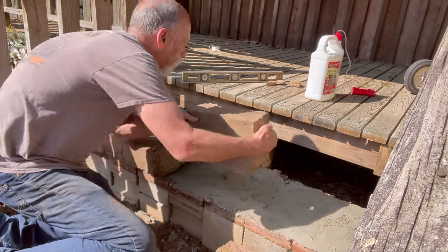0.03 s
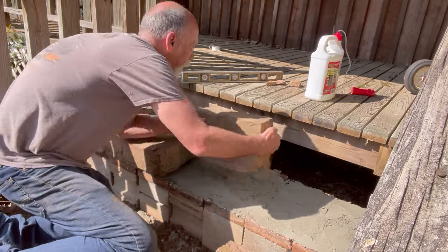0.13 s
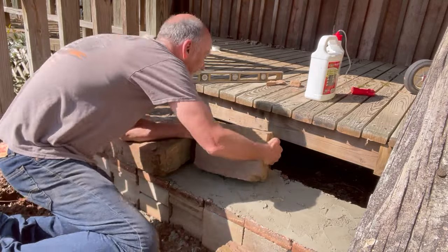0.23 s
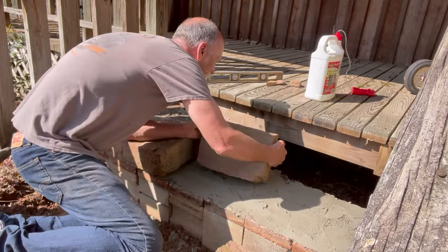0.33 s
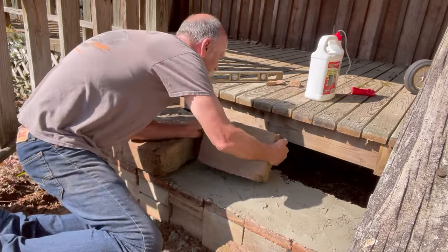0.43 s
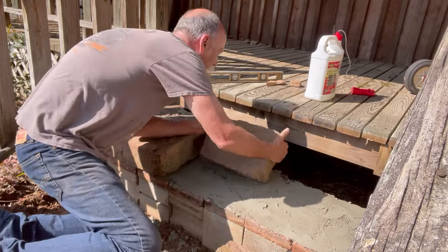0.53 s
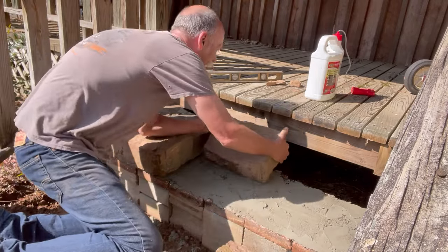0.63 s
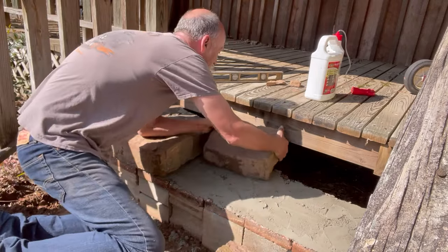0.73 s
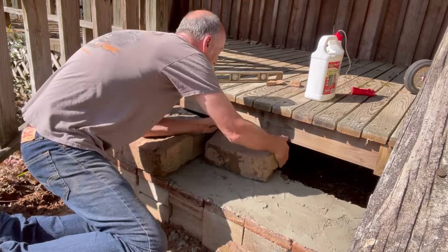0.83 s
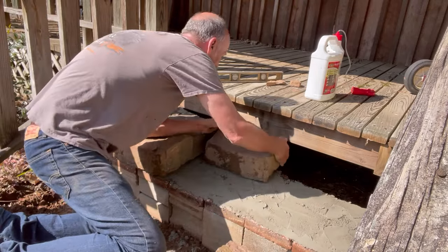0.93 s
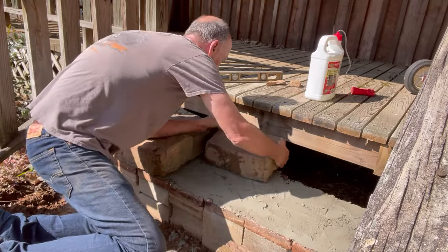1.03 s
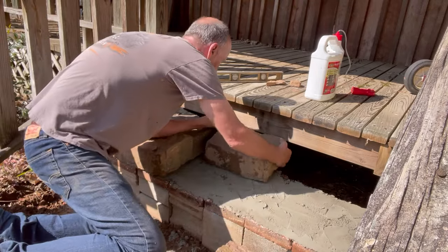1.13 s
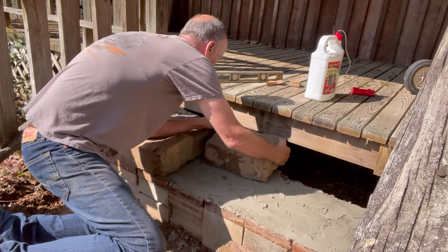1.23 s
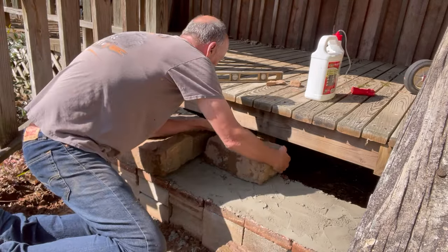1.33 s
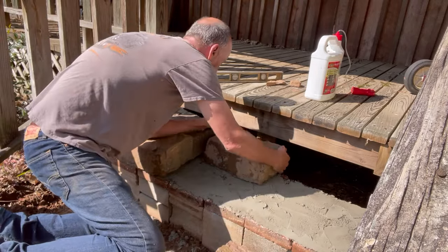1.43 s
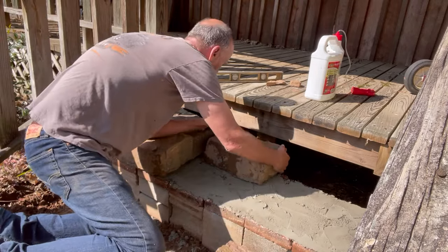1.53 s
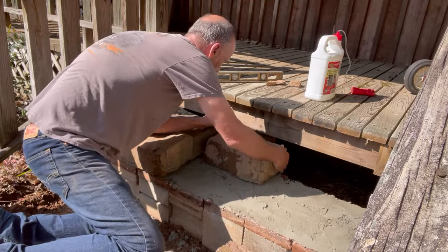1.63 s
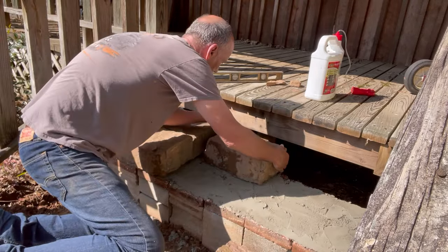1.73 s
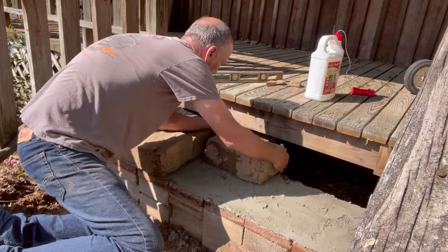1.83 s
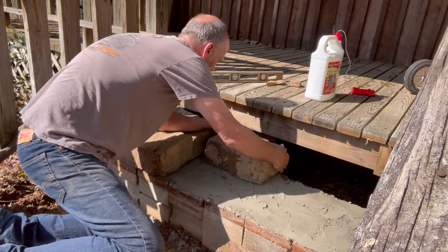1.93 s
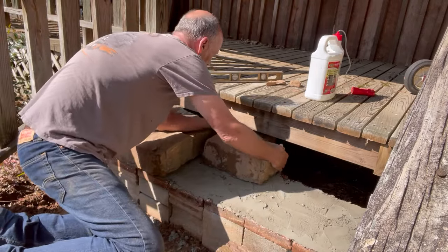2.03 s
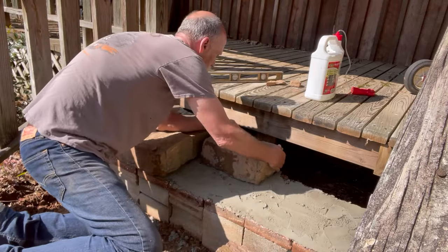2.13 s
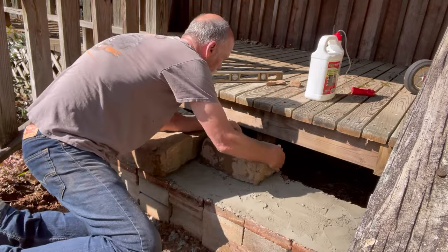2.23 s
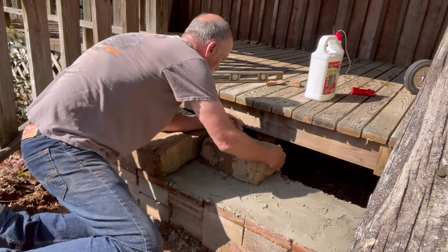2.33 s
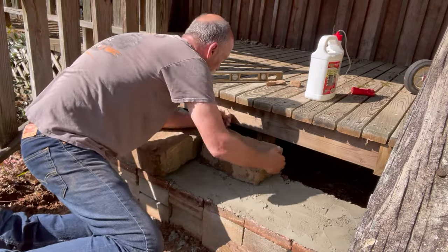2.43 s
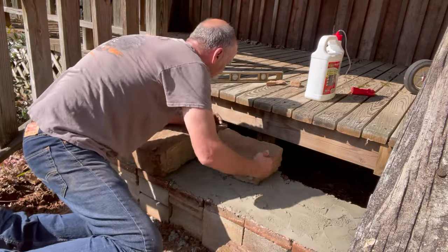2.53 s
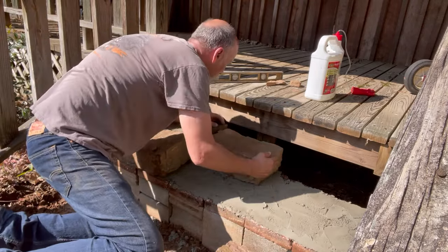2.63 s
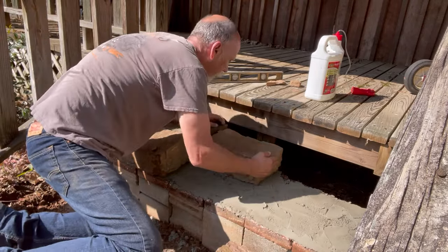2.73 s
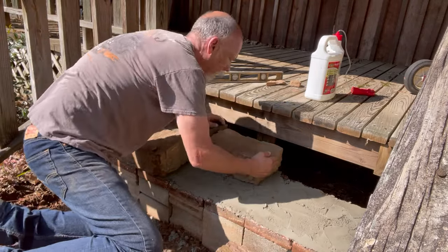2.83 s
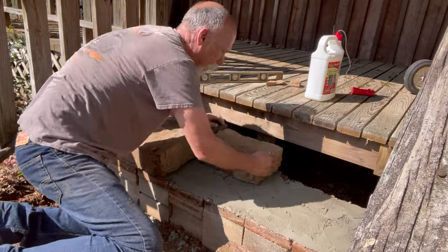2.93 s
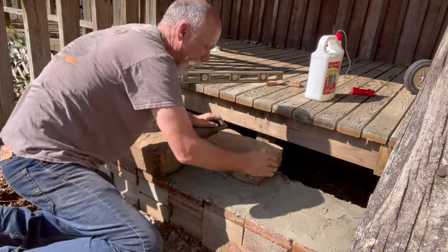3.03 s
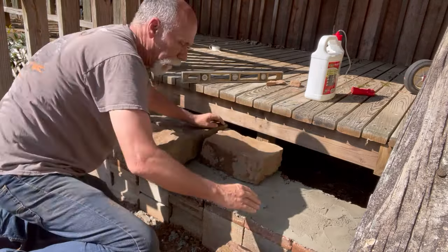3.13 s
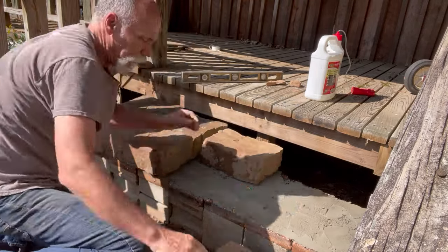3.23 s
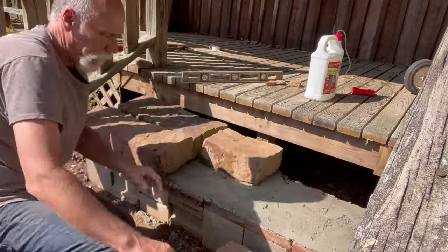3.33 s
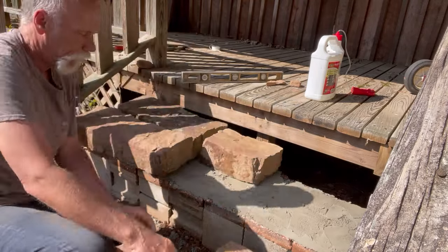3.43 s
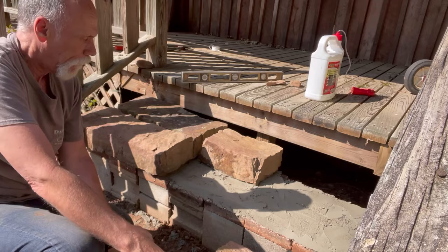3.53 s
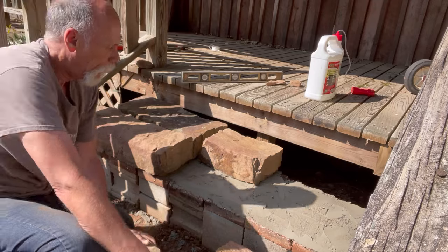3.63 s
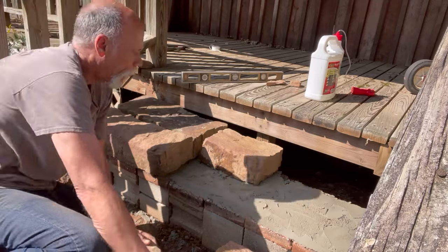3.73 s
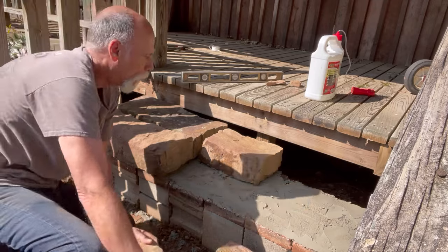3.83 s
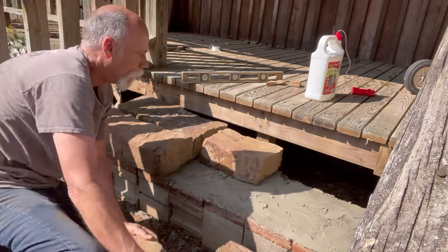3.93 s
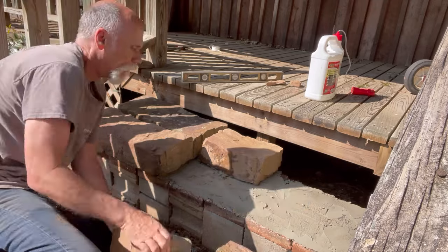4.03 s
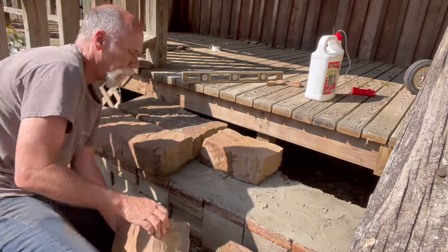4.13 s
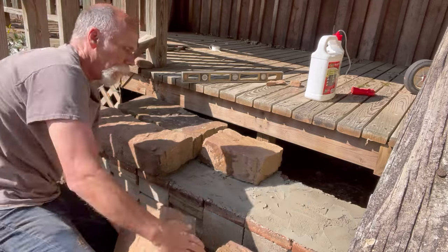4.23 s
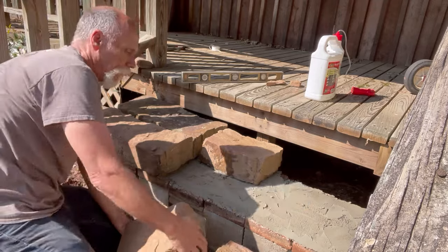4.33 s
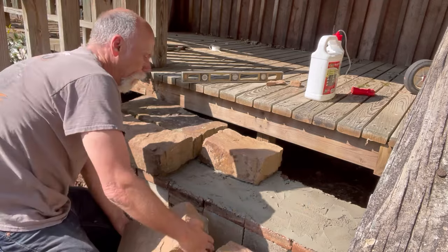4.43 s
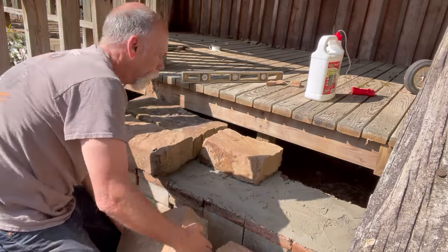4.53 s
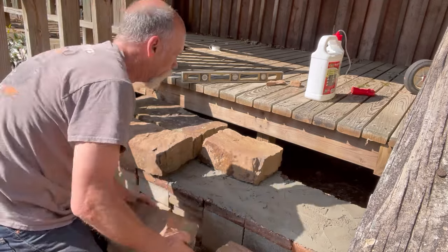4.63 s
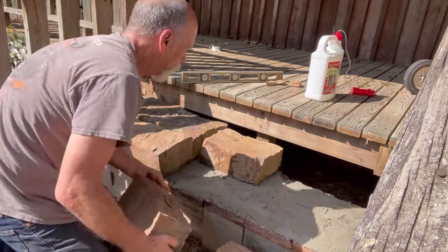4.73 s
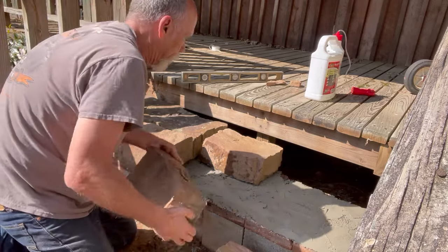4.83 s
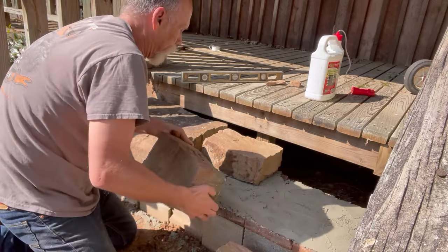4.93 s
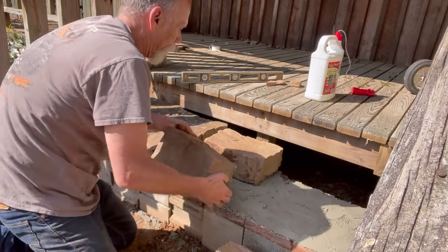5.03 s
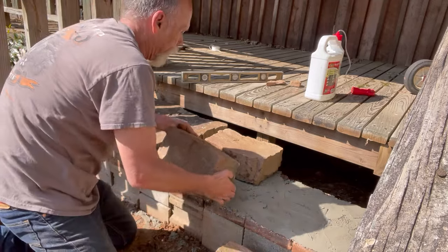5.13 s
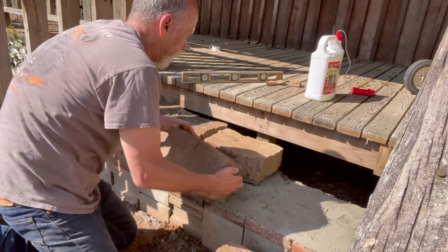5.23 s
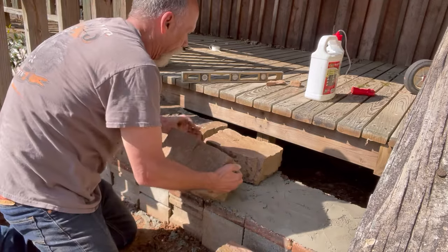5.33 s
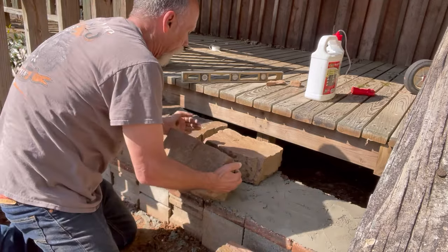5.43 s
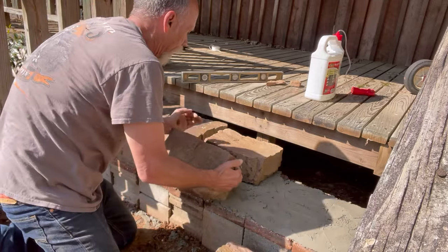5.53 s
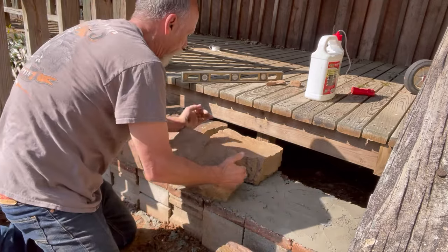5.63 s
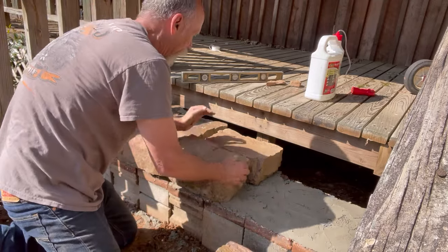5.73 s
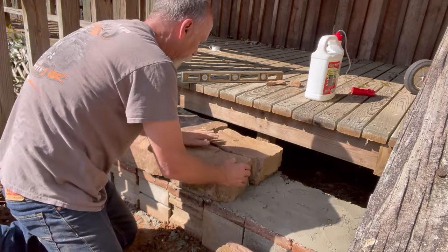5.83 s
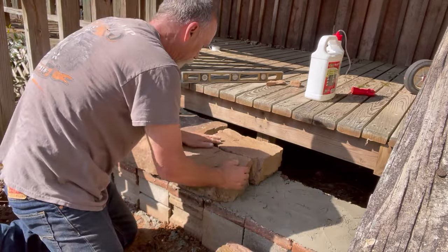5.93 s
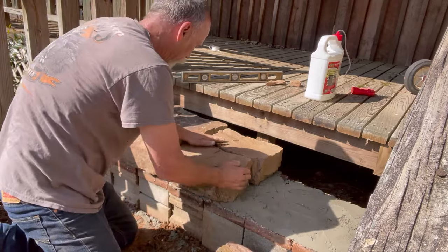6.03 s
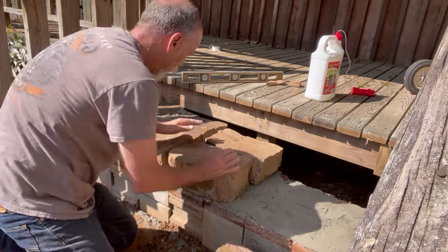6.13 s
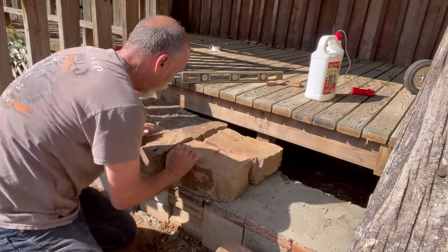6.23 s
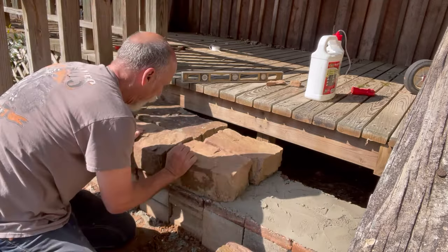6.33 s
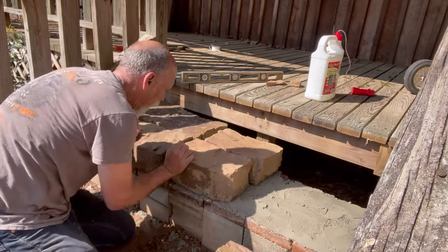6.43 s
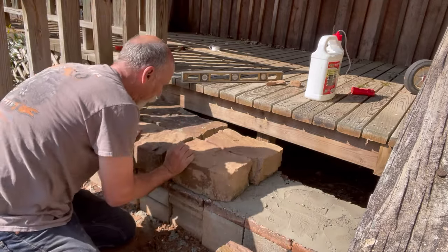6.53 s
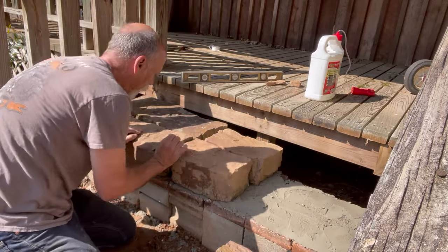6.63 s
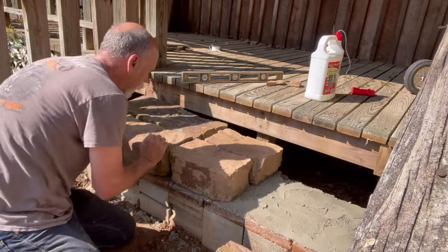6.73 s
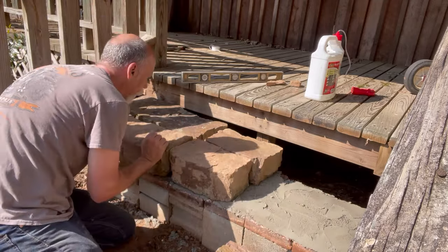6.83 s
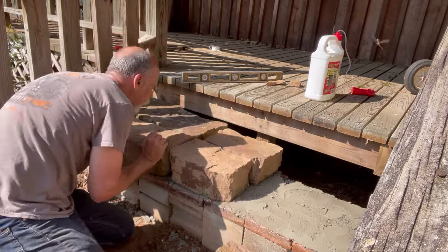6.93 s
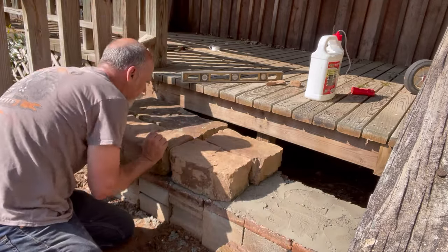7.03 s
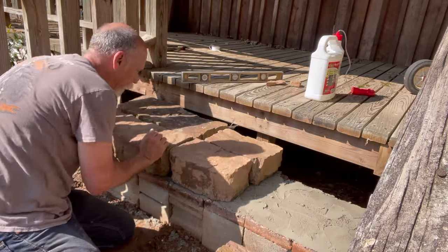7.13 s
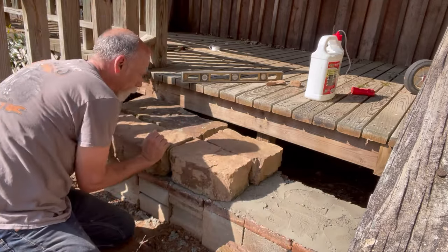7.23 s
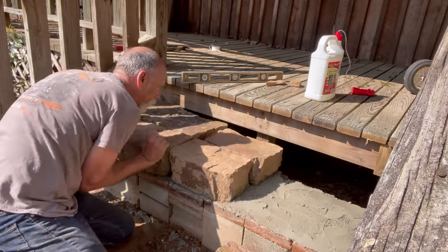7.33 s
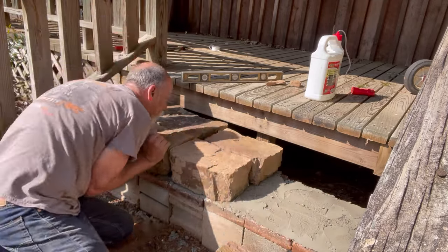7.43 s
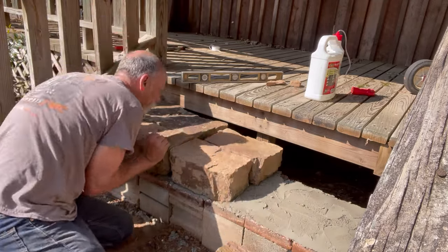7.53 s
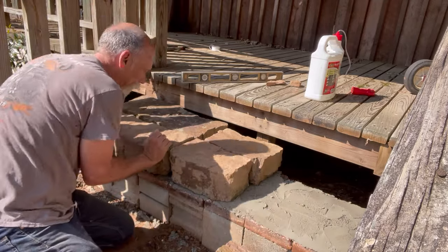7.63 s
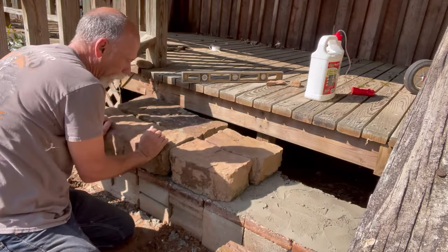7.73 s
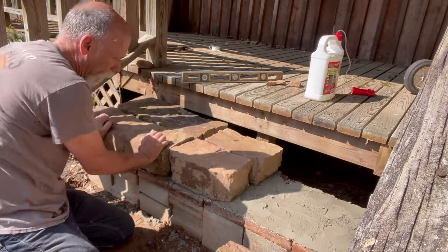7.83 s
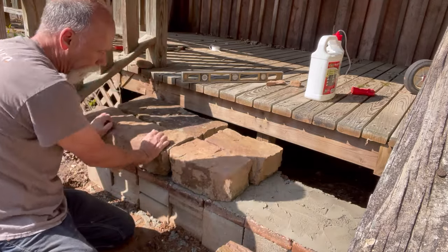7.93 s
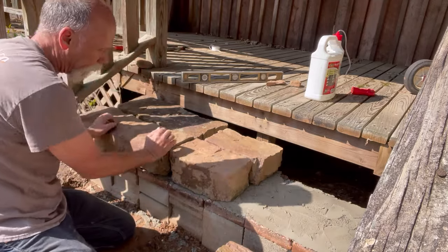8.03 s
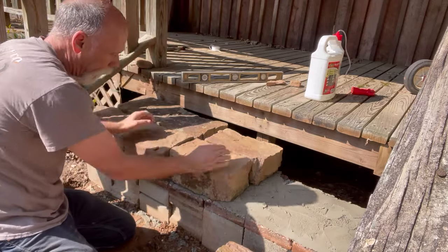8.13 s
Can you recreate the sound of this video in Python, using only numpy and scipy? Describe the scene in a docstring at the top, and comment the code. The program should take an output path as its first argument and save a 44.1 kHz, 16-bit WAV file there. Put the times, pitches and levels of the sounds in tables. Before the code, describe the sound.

Outdoors beside a wooden deck, a nearby microphone picks up a stone block being slid and knocked into position, with sharp clacks and crunching grit. After a lull of soft shuffling and small rubble clicks, a second block knocks against the stone several times and is bumped firmly home. One more knock and light scrapes follow. Faint clothing rustle and a distant, road-like hum and hiss lie underneath.

```python
"""Two sandstone blocks are set by hand on a mortared ledge under a wooden deck.
Over a distant hum and hiss, clothes rustle and the first block is slid and knocked into place.
Each impact excites the block's modes in a short clack, then the ledge's in a slower thud; grit ticks
and scrapes, and the deck reflects it all. From about 3 s the hands only stir loose rubble. After 5 s
the second block is knocked home, and a few light taps and scrapes follow."""
import sys
import numpy as np
from scipy import signal
from scipy.fft import rfft, irfft, next_fast_len
from scipy.io import wavfile
from scipy.ndimage import uniform_filter1d

SR = 44100
rng = np.random.default_rng(int(sys.argv[2]) if len(sys.argv) > 2 else 0)


def generate_wav(signal):
    """Clip the signal to [-1, 1] and save it as 16-bit WAV at the path in sys.argv[1]."""
    frames = np.transpose(np.atleast_2d(signal))
    scaled = np.clip(frames, -1, 1) * 32767
    pcm = np.round(scaled).astype(np.int16)
    wavfile.write(sys.argv[1], SR, pcm)


N = 361619
RUBBLE_S, SECOND_BLOCK_S = 2.85, 4.9  # when the hands turn to the rubble, then to the second block

# Each row: start in seconds, clack peak in dB, contact pitch in Hz, bright edge peak in dB,
# thud peak in dB, left over right in dB, contact time in seconds.
KNOCKS = [(0.187, -47, 654, -65, -42, -3, 0.0013), (0.3225, -14, 1030, -19, -14.5, 0, 0.0015),
          (0.341, -30, 1490, -52, -52, -3, 0.00095), (0.368, -39, 1390, -29.5, -32, -1, 0.0033),
          (0.635, -43, 1370, -59, -47, -2, .0013), (0.744, -45, 1140, -44.5, -62, -2, 0.0027),
          (0.8185, -26.5, 605, -31, -27, -3, 0.0016), (0.906, -40, 640, -36, -35, 1, 0.001),
          (0.945, -16, 730, -23.5, -25, -2.5, 0.0018), (1.4147, -6, 1125, -19, -14, -1.5, 0.0018),
          (1.4198, -34, 277, -50, -26, 3, 0.0029), (1.429, -42, 910, -35, -34, 2, 0.00077),
          (1.848, -47, 493, -67, -42.5, 20, 0.0024), (2.064, -40.5, 2630, -37, -43, 1, 0.0022),
          (2.211, -42, 4450, -46, -51, -4, 0.00092), (2.227, -47, 4500, -60, -63, -4, .001),
          (2.234, -36.5, 5230, -60, -58, -8, 0.00049), (2.245, -44, 4570, -52, -60, -4, 0.00087),
          (2.221, -37, 1074, -57, -38.5, -3, 0.0019), (2.233, -39, 920, -41, -50, -1, 0.00088),
          (2.315, -49, 1230, -50, -64, -4, 0.0028), (2.378, -48.5, 605, -52.5, -55, 25, 0.0069),
          (2.697, -29.5, 1250, -29, -30, -3, 0.0027), (2.704, -29.5, 1160, -32, -47, -1, 0.0021),
          (2.755, -50, 1280, -54, -61, -4, 0.0016), (3.509, -36, 536, -61, -48, 9, 0.001),
          (3.562, -38, 575, -62, -58, 7, 0.00044), (3.8358, -39, 2520, -39.5, -45, 10, 0.00067),
          (4.327, -34.5, 966, -44, -40, 2, 0.0012), (4.499, -44.5, 556, -71, -49, 23, 0.00047),
          (4.612, -44, 715, -72, -52, 4, 0.0039), (5.2217, -19, 800, -57, -32, -0.5, 0.00063),
          (5.2626, -19, 1675, -28, -17, -4, 0.0018), (5.2646, -11, 1210, -40, -38, -2, 0.00081),
          (5.492, -30, 614, -50, -34.5, -2, 0.002), (5.571, -45.5, 1010, -49, -60, -3, 0.00065),
          (5.591, -54, 1500, -53, -50, -1, .001), (5.627, -55, 1500, -57, -56, -4, 0.0011),
          (5.643, -32, 674, -50, -35, -1, 0.0029), (5.676, -43, 800, -44.5, -50, 4, 0.0019),
          (5.697, -34, 885, -46, -28.5, 1, 0.00057), (5.7073, -24.5, 660, -43, -37, -2, 0.00095),
          (5.72, -46, 580, -45.5, -44, -1, 0.0014), (5.761, -25.5, 664, -38.5, -31, -1, 0.001),
          (5.8124, -5.5, 887, -22, -11.5, -0.5, 0.0011), (5.825, -38, 660, -21, -37, -1, 0.0013),
          (5.838, -27, 1390, -31, -44, 3, 0.00087), (5.846, -33, 1310, -43, -38, 0, .001),
          (5.8582, -25, 1950, -36, -21, -2, 0.0009), (5.8678, -15.5, 1136, -35, -18, -2, 0.0031),
          (6.512, -19.5, 720, -36, -26, -1, 0.0018), (7.125, -37, 490, -45, -40.5, 14, 0.0026),
          (7.74, -44, 960, -62, -63, 0, 0.0014)]
def knock(mix, s, db, hz, edge_db, thud_db, pan_db, contact_s):
    """Impact: one blow excites block and ledge, crushes grit and ends in brief sliding friction."""
    add(mix, s, amp(db) * clack(s, hz, contact_s) + amp(edge_db) * bright_edge(s), pan_db)
    add(mix, s, amp(thud_db) * ledge_thud(s, clack_over_thud_db=db - thud_db), 0)
    tick(mix, s, edge_db - 12, hz=4900, pan_db=pan_db)
    scrape(mix, s, length_s=0.032, db=db - 30.5, hz=0.71 * hz, octaves=0.7, pan_db=pan_db)


def clack(s, hz, contact_s):
    """Forced, then free vibration: a few cycles while the faces meet, then the block rings on."""
    contacts = np.arange(3000) / SR / np.clip(contact_s, .0005, .008)  # time in contact times
    sag_octaves = .3 if hz < 950 else 0  # a dull blow falls in pitch as the faces seat
    pitch = hz * 2 ** (sag_octaves * (1 - contacts))
    burst = (contacts * np.exp(1 - contacts)) ** 2.8 * np.sin(2 * np.pi * np.cumsum(pitch) / SR)
    onset = np.sin(np.pi / 2 * np.minimum(contacts, 1)) ** 2
    ring = onset * peaked(block_ring(s, hz, octaves=0.56))
    ring_share = .6 if s < SECOND_BLOCK_S else .65
    return peaked(burst + ring_share * ring)


def bright_edge(s):
    """Hard contact: a corner briefly excites the block's upper modes."""
    t = np.arange(3000) / SR
    hz, octaves = (2110, 0.53) if s < SECOND_BLOCK_S else (2360, 0.59)
    rise_s, fall_s = (.0016, .006) if s < SECOND_BLOCK_S else (.002, .03)
    envelope = (1 - np.exp(-(t / rise_s) ** 2)) * np.exp(-t / fall_s)
    return peaked(envelope * block_ring(s, hz, octaves))


# Modes of each block. Each row: frequency in Hz, relative level in dB, 60 dB decay time in seconds.
FIRST_BLOCK_MODES = [(392, 13, 0.041), (660, 9.5, 0.016), (844, -2, 0.042), (1070, 1, 0.018),
                     (1267, -6, 0.031), (1443, -5.5, 0.04), (1865, 1, 0.014), (2210, 0.5, 0.011),
                     (2550, -5.5, 0.015), (3170, 3, 0.0083), (4200, 3.5, 0.012), (5940, 3, 0.009),
                     (8400, 0, 0.007)]
SECOND_BLOCK_MODES = [(365, 12, 0.02), (469, 7, 0.015), (679, 3, 0.02), (906, -5, 0.02), (1080, -5, 0.018),
                      (1150, 1.5, 0.013), (1500, -0.5, 0.015), (2024, -1.5, 0.015), (2550, -5.5, 0.019),
                      (2980, -5, 0.016), (4780, -11, 0.022), (4900, -12, .014), (8200, -16, 0.017)]
def block_ring(s, centre_hz, octaves):
    """Modal superposition: damped sines, their level and pitch varying with the spot struck."""
    modes = FIRST_BLOCK_MODES if s < SECOND_BLOCK_S else SECOND_BLOCK_MODES
    hz, db, t60 = np.transpose(modes)[:, :, None]
    t = np.arange(3000) / SR
    polarity = (-1) ** np.arange(len(modes))[:, None]
    spot_gain = polarity * amp(2.5 * rng.standard_normal(hz.shape))
    hz = hz * (1 + .015 * rng.standard_normal(hz.shape))
    partials = amp(db - 60 * t / t60) * np.sin(2 * np.pi * hz * t)
    return (spot_gain * contact_band(hz, centre_hz, octaves) * partials).sum(0)


def contact_band(hz, centre_hz, octaves):
    """Selective excitation: a contact passes a Gaussian band of pitches around its own."""
    return np.exp(-.5 * (np.log2(hz / centre_hz) / max(octaves, .05)) ** 2)


# Modes of the ledge and the hollow under the deck. Each row: frequency in Hz, relative level in dB,
# 60 dB decay time in seconds, rise time in seconds.
LEDGE_MODES = [(101, 11, 0.2, 0.044), (112, 7.5, 0.1, 0.0084), (176.4, 6, 0.048, 0.0091),
               (252.4, 7, 0.04, 0.0053), (336, 4, 0.039, 0.0042), (420, -7, 0.019, 0.0014)]
def ledge_thud(s, clack_over_thud_db):
    """Resonant build-up: low modes answer late, and higher ones are favoured under a crisper clack."""
    hz, db, t60, rise_s = np.transpose(LEDGE_MODES)[:, :, None]
    t = np.arange(6000) / SR
    centre_hz = (190 if s < SECOND_BLOCK_S else 244) * 2 ** (.015 * clack_over_thud_db)
    swell = (t / rise_s) ** 2 / (1 + (t / rise_s) ** 2)
    partials = swell * amp(db - 60 * t / t60) * np.sin(2 * np.pi * hz * t)
    return peaked((contact_band(hz, centre_hz, octaves=0.76) * partials).sum(0))


# Sharp grit ticks, some crushed under the blows and some between them.
# Each row: start in seconds, peak in dB, pitch in Hz, left over right in dB.
TICKS = [(0.3246, -43, 4800, -4), (0.944, -31, 4560, -2), (2.696, -42.5, 4300, -3), (5.262, -37, 5230, -2),
         (5.8249, -25, 4800, -1), (5.8243, -30, 7700, 1), (5.858, -34, 4800, -4), (5.868, -35.5, 6300, -1),
         (0.3405, -34.5, 4480, 2), (1.075, -46, 8000, -1), (1.3517, -34, 4670, -1.5),
         (1.392, -44, 4400, -2.5), (1.53, -43, 4530, 6), (1.8592, -37.5, 4230, 7), (1.935, -45, 3960, 11),
         (2.113, -50, 5530, 0), (2.598, -46, 4070, 4), (2.664, -45, 5600, -9), (2.8084, -43, 5200, -8),
         (3.5506, -42.5, 4700, 5), (4.163, -47, 4100, -5), (4.3259, -30, 5600, -1.5),
         (4.595, -38.5, 3570, 3), (4.6412, -38, 5760, -3), (5.287, -54, 4670, 0), (5.697, -50, 8400, -6),
         (5.7418, -41.5, 8400, -2.5), (5.8113, -24, 4800, -3), (6.1428, -48, 4000, 7),
         (6.1995, -37.5, 4660, 8), (6.324, -43.5, 4000, 7), (6.736, -40, 4500, 8)]
def tick(mix, s, db, hz, pan_db):
    """Brittle fracture: a grain snaps in a burst of noise, strongest near its pitch."""
    t = np.arange(500) / SR
    rise_s, t60 = .0009, .01
    fizz = rng.standard_normal(len(t)) * amp(-60 * t / t60) * np.minimum(t / rise_s, 1)
    pitched = bandpass(fizz, hz / 1.18, hz * 1.18, order=2)
    wide = bandpass(fizz, 3000, 11000, order=1)
    add(mix, s, amp(db) * peaked(pitched + 0.46 * wide), pan_db)


# Stone sliding on stone. Each row: start in seconds, length in seconds, rms level in dB,
# favoured pitch in Hz, breadth in octaves, left over right in dB.
SCRAPES = [(0, 0.066, -57, 860, 0.62, 5), (0.115, 0.13, -62.5, 500, 0.33, 6),
           (0.354, 0.05, -52.5, 1480, 0.97, -4), (0.463, 0.097, -52.5, 1140, 0.81, 1),
           (0.582, 0.31, -61, 1140, 0.43, 1), (0.851, 0.072, -50.5, 700, 0.97, 0),
           (0.898, 0.037, -40, 930, 1, 0), (0.958, 0.051, -45.5, 378, 0.43, 0),
           (1.309, 0.084, -45, 1070, 0.49, 0), (1.317, 0.037, -67, 4400, 0.16, -1),
           (1.38, 0.053, -42.5, 1050, 0.91, 0), (1.816, 0.088, -55.5, 696, 1.6, -1),
           (1.925, 0.059, -59, 654, 0.26, 9), (2.015, 0.074, -52, 2000, 0.87, -1),
           (2.031, 0.058, -46.5, 2620, 0.048, 0), (2.038, 0.05, -53, 1280, 0.11, 3),
           (2.069, 0.04, -58, 5870, 0.42, -4), (2.171, 0.095, -57, 1490, 0.86, -1),
           (2.349, 0.07, -56.5, 624, 0.29, -7), (2.501, 0.084, -61.5, 600, 0.22, 7),
           (2.654, 0.032, -56, 2200, 0.86, 1), (2.692, 0.02, -44.5, 5260, 0.35, -11),
           (2.731, 0.11, -68.5, 5900, 0.23, -6), (2.899, 0.15, -57, 2280, 0.68, 7),
           (3.804, 0.084, -54.5, 2180, 0.69, -3), (4.033, 0.097, -59, 900, 1.03, 3),
           (4.602, 0.061, -59.5, 740, 0.55, -7), (5.225, 0.045, -52, 690, 1.9, 0),
           (5.399, 0.067, -46, 1004, 0.59, 0), (5.564, 0.043, -60, 3040, 0.081, 1),
           (5.572, 0.054, -59, 2000, 0.28, -1), (5.566, 0.083, -60, 750, 0.46, -2),
           (5.791, 0.04, -40, 1020, 0.75, -4), (6.125, 0.063, -59, 750, 0.56, 4),
           (6.973, 0.075, -56, 600, 3.1, -1), (7.121, 0.043, -51.5, 500, 1.1, -4),
           (7.441, 0.1, -53.5, 1960, 1.8, -2), (7.71, 0.089, -53, 1010, 0.75, 0)]
def scrape(mix, s, length_s, db, hz, octaves, pan_db):
    """Sliding friction: many uneven catches of grit each ring the block and crunch dryly."""
    catches_per_s = 2500
    chance, force = rng.random((12000, 2))[:round(length_s * SR)].T
    strength = np.sign(force - .5) * amp(-3.0 * np.log(abs(2 * force - 1) + 0.0065))  # a few are large
    catches = (chance < catches_per_s / SR) * strength * signal.windows.tukey(len(chance), .7)
    burst = rng.standard_normal(3000) * np.exp(-np.arange(3000) / SR / 0.0028)
    bins_hz = np.fft.rfftfreq(3000, 1 / SR) + 1
    crunch = irfft(rfft(burst) * contact_band(bins_hz, 0.55 * hz, 2.64 * octaves))
    ring_share = .15 if RUBBLE_S < s < SECOND_BLOCK_S else 1  # rubble hardly rings
    response = ring_share * unit_rms(block_ring(s, hz, octaves)) + 0.32 * unit_rms(crunch)
    sound = signal.fftconvolve(catches, response)
    sliding_rms = np.sqrt(np.mean(sound[:len(catches)] ** 2))
    add(mix, s, amp(db) * sound / sliding_rms, pan_db)


# Echoes off the deck. Each row: frequency in Hz, 60 dB decay time in seconds.
DECK_DECAY = [(150, 0.11), (500, 0.16), (1200, 0.058), (3000, 0.089), (9000, 0.03)]
def deck_echoes(stones):
    """Reverberation: the stones' sound is convolved with the impulse response under the deck."""
    response = reflections(first_sample=120, decays=DECK_DECAY)
    return amp(-10) * signal.fftconvolve(stones, response[None], axes=1)[:, :N]


def reflections(first_sample, decays):
    """Frequency-dependent absorption: sparse echoes of random sign, each band dying at its own rate."""
    slots = np.arange(first_sample, 8100, 16)
    arrivals = slots + rng.integers(0, 16, len(slots))
    taps = np.zeros(8192)
    taps[arrivals] = rng.choice([-1., 1.], len(arrivals))
    hz, t, bands = signal.stft(taps, SR, nperseg=256)
    bands = bands * amp(-60 * t / at_hz(decays, hz)[:, None])
    bands /= np.linalg.norm(bands, axis=1, keepdims=True)
    tail = signal.istft(bands, SR, nperseg=256)[1]
    return tail / np.linalg.norm(tail)


# Stereo width of the stones. Each row: frequency in Hz, direct side signal over mid in dB.
WIDTH = [(60, -22), (110, -28), (200, -24), (380, -14), (700, -15), (1290, -9.5), (2380, -12.5), (4400, -4),
         (8120, -3), (15000, 1)]
def path_difference(stones):
    """Phase difference: two microphones hear unlike paths; a quarter-turn shift keeps them as loud."""
    size = next_fast_len(N)
    width = amp(at_hz(WIDTH, np.fft.rfftfreq(size, 1 / SR)))
    side = irfft(1j * rfft(stones.mean(0), size) * width, size)[:N]
    close_echoes = reflections(first_sample=20, decays=[(300, 0.11), (8000, 0.025)])
    side = side + amp(-0.5) * signal.fftconvolve(side, close_echoes)[:N]
    return np.array([side, -side])


# Swishes of cloth and sand. Each row: middle in seconds, half length in seconds, level in dB.
SWISHES = [(0.016, 0.032, -57.5), (0.187, 0.028, -60), (0.524, 0.06, -55), (0.654, 0.12, -58.5),
           (0.887, 0.089, -57), (1.12, 0.071, -60), (1.353, 0.031, -51), (1.56, 0.028, -56.5),
           (1.87, 0.02, -69), (1.973, 0.063, -60.5), (2.21, 0.047, -55), (2.366, 0.029, -57),
           (2.567, 0.049, -61.5), (2.942, 0.044, -56), (4.064, 0.082, -72), (4.488, 0.053, -60),
           (4.657, 0.071, -58.5), (5.357, 0.035, -60), (5.442, 0.04, -56.5), (5.58, 0.051, -66),
           (6.047, 0.02, -55.5), (6.207, .04, -74), (6.315, 0.044, -67), (6.613, 0.06, -58),
           (6.742, 0.0088, -55), (7.02, 0.035, -66), (7.27, 0.088, -63.5), (7.465, 0.1, -65),
           (7.788, .04, -62.5)]
# The faint stir between them. Each row: time in seconds, level in dB.
STIR = [(0, -68.5), (2.4, -66.5), (2.8, -73.5), (3.7, -64.5), (4.3, -66), (4.8, -84), (5.2, -74),
        (5.6, -67.5), (6.3, -65), (7.1, -70.5), (8.2, -78)]
def rustle_gain():
    """Incoherent addition: the stir, the swishes and a puff of sand at each blow sum in power."""
    power = level_curve(STIR) ** 2
    puffs = [(s + 0.0029, 0.009, -39 + 0.41 * edge_db) for s, _, _, edge_db, *_ in KNOCKS]
    for s, half_s, db in SWISHES + puffs:
        span = np.arange(max(round((s - 3 * half_s) * SR), 0), min(round((s + 3 * half_s) * SR), N))
        power[span] += (amp(db) * np.exp(-((span / SR - s) / half_s) ** 2)) ** 2
    return np.sqrt(power)


# Spectrum of cloth and sand. Each row: frequency in Hz, relative level in dB.
RUSTLE_SPECTRUM = [(1200, -35), (2500, -6), (4000, -2), (6500, -7), (8500, -5.5), (12000, -12),
                   (16000, -14.5)]
def rustle():
    """Friction noise: cloth and sand hiss, broken into fine grains by fast amplitude modulation."""
    grains = amp(1.8 * unit_rms(uniform_filter1d(rng.standard_normal(N), size=90)))
    hiss = noise(RUSTLE_SPECTRUM, coherence=[(2000, .5), (8000, .1)], patchy_db=1.4, flicker_db=1.2)
    return rustle_gain() * unit_rms(grains * hiss)


# Spectrum of the shuffle. Each row: frequency in Hz, relative level in dB.
SHUFFLE_SPECTRUM = [(120, -28), (200, -0.5), (280, -5), (420, -12), (700, -20), (1500, -41.5)]
# The worker's shifting weight. Each row: time in seconds, level in dB.
WEIGHT_SHIFTS = [(0, -57), (.2, -70), (.4, -59), (1.14, -62.5), (1.32, -78), (1.5, -61), (1.67, -63),
                 (2.47, -63.5), (2.88, -58), (3.31, -61.5), (3.95, -52), (4.25, -57), (4.73, -60),
                 (4.92, -72), (5.23, -58), (5.72, -56.5), (5.93, -61), (6.32, -64.5), (6.85, -71),
                 (7.2, -60), (7.95, -58), (8.2, -104)]
def shuffle():
    """Amplitude modulation: dull noise swells as knees and weight shift on the ground."""
    rumble = noise(SHUFFLE_SPECTRUM, coherence=[(200, .9), (800, .7)], patchy_db=1.5, flicker_db=2.2)
    return level_curve(WEIGHT_SHIFTS) * rumble


# Spectrum of the distant hum and hiss. Each row: frequency in Hz, relative level in dB.
YARD_SPECTRUM = [(18, -79.5), (30, -69), (75, -2.5), (112, 12), (174, -14.5), (210, -11.5),
                 (426, -31.5), (473, -24), (666, -26), (721, -24), (1350, -13.5), (2230, -24),
                 (3310, -25), (6210, -37.5), (16000, -42)]
# Likeness of the two channels. Each row: frequency in Hz, correlation from -1 to 1.
YARD_COHERENCE = [(60, 1), (130, 0.89), (290, -0.15), (640, 0.2), (1410, -0.46), (3100, -0.16),
                  (6820, -0.07), (15000, -0.72)]
def yard():
    """Ambient noise: a low hum and road-like hiss, with a thin high band fluttering in and out."""
    band_hz, half_width_hz = 3300, 31.5
    white = rng.standard_normal((2, N))
    thin_band = unit_rms(bandpass(white, band_hz - half_width_hz, band_hz + half_width_hz, order=2))
    flutter_db = 2.2 * drift(fastest_hz=9)
    hum_and_hiss = noise(YARD_SPECTRUM, YARD_COHERENCE, patchy_db=1.54, flicker_db=1.47)
    return amp(-47) * hum_and_hiss + amp(-78 + flutter_db) * thin_band


def noise(spectrum, coherence, patchy_db, flicker_db):
    """Spectral shaping: stereo noise of rms 1 with drifting patches and a flicker across all pitches."""
    frames, hz = N // 256 + 5, np.fft.rfftfreq(1024, 1 / SR)
    left_re, left_im, other_re, other_im, patches = rng.standard_normal((frames, 513, 5)).T
    patches = unit_rms(uniform_filter1d(uniform_filter1d(patches, size=12, axis=0), size=10, axis=1))
    alike = at_hz(coherence, hz)[:, None]
    left = left_re + 1j * left_im
    right = alike * left + np.sqrt(1 - alike ** 2) * (other_re + 1j * other_im)
    db = at_hz(spectrum, hz)[:, None] + patchy_db * patches + flicker_db * rng.standard_normal(frames)
    shaped = amp(db) * np.array([left, right])
    return unit_rms(signal.istft(shaped, nperseg=1024, noverlap=768)[1][:, :N])


def drift(fastest_hz):
    """Random-phase superposition: slow sines sum to a wandering curve of rms 1."""
    t = np.arange(N // 128 + 1) * 128 / SR
    rates_hz = np.geomspace(.2, fastest_hz, num=24)
    curve = sum(np.sin(2 * np.pi * (hz * t + rng.random())) / np.sqrt(hz) for hz in rates_hz)
    return np.repeat(unit_rms(curve), 128)[:N]


def add(mix, s, sound, pan_db):
    """Level panning: adds a sound at s seconds, pan_db louder on the left."""
    part = mix[:, round(s * SR):][:, :len(sound)]
    part += amp([[pan_db / 2], [-pan_db / 2]]) * sound[:part.shape[1]]


def bandpass(x, low_hz, high_hz, order):
    return signal.sosfilt(signal.butter(order, [low_hz, high_hz], "band", fs=SR, output="sos"), x)


def at_hz(points, hz):
    """Interpolation on a log-frequency axis."""
    known_hz, value = np.transpose(points)
    return np.interp(np.log(hz + 1), np.log(known_hz + 1), value)


def level_curve(points):
    """Interpolation in decibels over time, returned as gain."""
    s, db = np.transpose(points)
    return amp(np.interp(np.arange(N) / SR, s, db))


def amp(db):
    return 10 ** (np.asarray(db) / 20)


def unit_rms(x):
    return x / np.sqrt(np.mean(x ** 2) + 1e-20)


def peaked(x):
    return x / abs(x).max()


def scene():
    """Superposition: the near stones and their echoes add to the worker's movements and the yard."""
    stones = np.zeros((2, N))
    for play, table in ((knock, KNOCKS), (tick, TICKS), (scrape, SCRAPES)):
        for row in table:
            play(stones, *row)
    stones = stones + deck_echoes(stones)
    return stones + path_difference(stones) + rustle() + shuffle() + yard()


def record(dry):
    """Band limiting: the microphone drops the deepest bass, and a steep low-pass the highest treble."""
    low_hz, high_hz = 95.7, 16150
    thinned = signal.sosfilt(signal.butter(3, low_hz, "high", fs=SR, output="sos"), dry)
    lowpass = signal.firwin(511, high_hz, window=("kaiser", 9), fs=SR)
    return signal.oaconvolve(thinned, lowpass[None], "same")


dry = scene()
out = record(dry)
generate_wav(out)
```